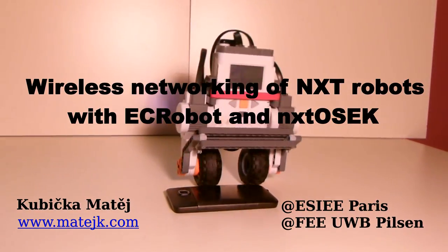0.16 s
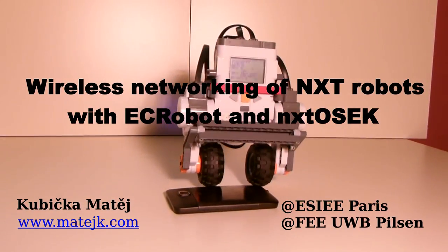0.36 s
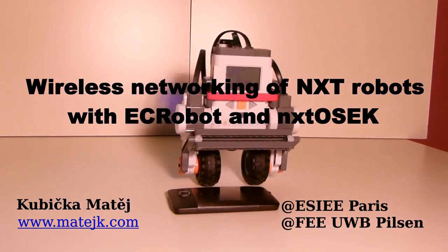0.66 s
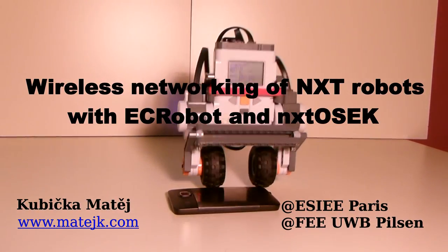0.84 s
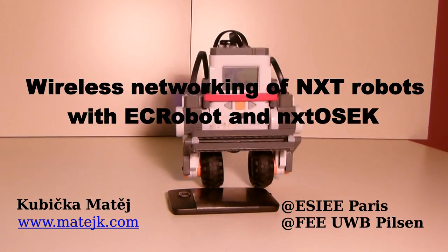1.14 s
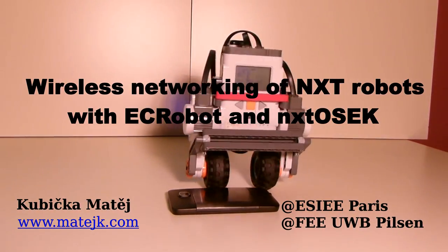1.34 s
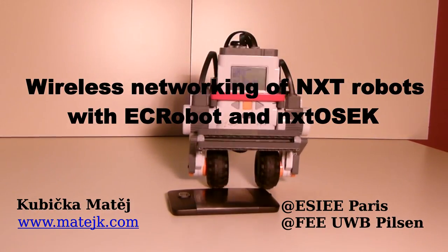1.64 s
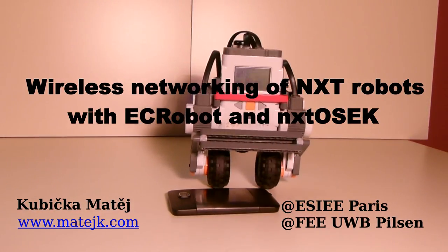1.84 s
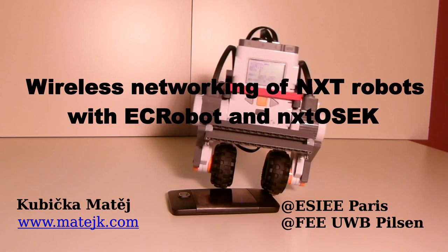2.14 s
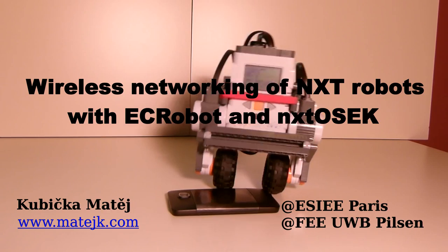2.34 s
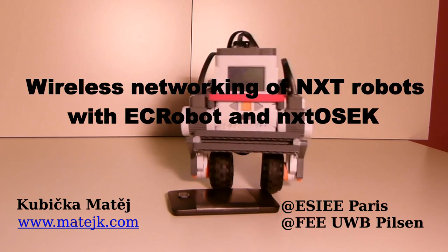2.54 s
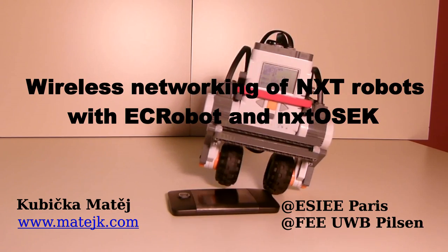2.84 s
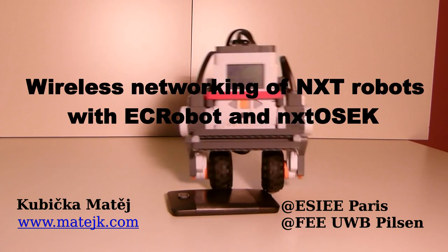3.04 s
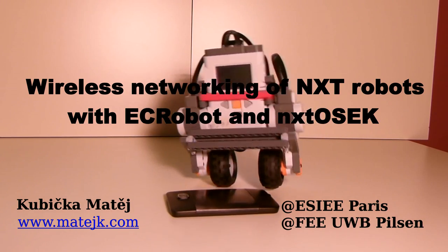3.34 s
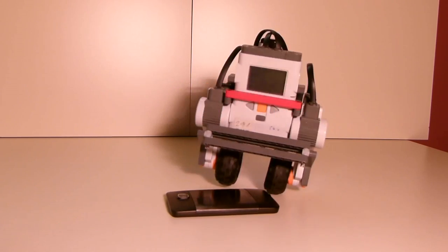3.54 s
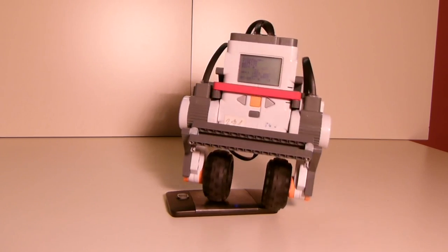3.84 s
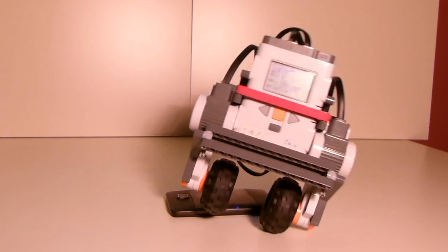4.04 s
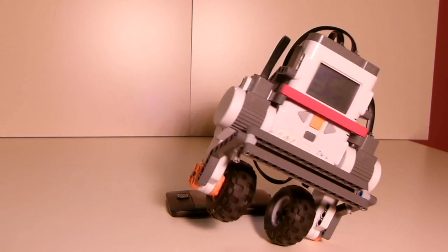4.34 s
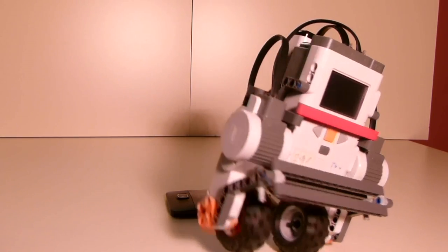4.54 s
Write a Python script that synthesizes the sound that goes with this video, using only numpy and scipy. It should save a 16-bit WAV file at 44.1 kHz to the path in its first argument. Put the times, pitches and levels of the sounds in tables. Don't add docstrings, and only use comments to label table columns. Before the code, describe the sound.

Gritty little servo whirs come and go two to four times a second, some with a brief nasal whine, as a toy robot rocks on its wheels. Tiny slack-gear snaps and dull table bumps fill the gaps over faint hiss and short room echo. Then comes a sustained hard whir, a second shove, a fade and an abrupt final run-up, drifting slightly right.

```python
import sys
import numpy as np
from scipy import signal
from scipy.fft import rfft, irfft
from scipy.io import wavfile
from scipy.ndimage import uniform_filter1d

SR = 44100
rng = np.random.default_rng(int(sys.argv[2]) if len(sys.argv) > 2 else 0)


def persist_wave(psi):
    counts = np.round(np.clip(psi, -1, 1) * 32767).astype(np.int16)
    wavfile.write(sys.argv[1], SR, np.atleast_2d(counts).T)


def gain_from_db(level_db):
    decades = np.asarray(level_db, float) / 20
    return 10 ** decades


N = 207005

MESH_ORDERS = (2, 3, 4), (1, 2, 3)
# pitch_hz, level_db (per Hz)
HOUSING = [(88, -104), (150, -61), (332, -10.5), (396, -21), (436, -17.5), (929, -12.5), (1690, 1.5),
           (1830, 1), (3340, -5), (3980, -1), (4920, -3.5), (5750, -1), (7840, -7), (12500, 4),
           (15500, -7.5)]
# pitch_hz, width_hz, level_db
SHELL = [(670, 29, 5), (1278, 290, -7.5), (1560, 13, -45), (2110, 67, -16.5), (3087, 43, -1),
         (3860, 330, -13.5), (4123, 32, 1), (5725, 116, -4.5), (6360, 480, -8), (7190, 53, -7.5),
         (10040, 580, -6), (10930, 120, -2)]
# start_s, end_s, start_level_db, end_level_db, brightness_db
PUSHES = [(-0.03, 0.012, -28, -26.5, -11), (0.185, 0.209, -30.5, -33.5, -8.5),
          (0.234, 0.332, -26.5, -27, -8), (0.492, 0.536, -36.5, -32.5, -2),
          (0.586, 0.628, -27.5, -29.5, -4.5), (0.78, 0.92, -30, -24.5, -8.5),
          (1.095, 1.115, -33, -34.5, -1.5), (1.147, 1.189, -32.5, -30, -6.5),
          (1.336, 1.409, -36.5, -27.5, -7), (1.416, 1.486, -28, -29.5, -3.5),
          (1.648, 1.727, -30.5, -28, -5), (1.9, 1.91, -27.5, -29, -8), (1.925, 1.988, -29.5, -26.5, -4),
          (2, 2.08, -28, -25, -4), (2.275, 2.326, -37.5, -38, 0), (2.363, 2.42, -38, -37, -6),
          (2.558, 2.618, -39.5, -28.5, -9.5), (2.619, 2.688, -29, -32.5, -11),
          (2.855, 2.928, -33, -40.5, -7.5), (3.073, 3.174, -27.5, -34, -3.5),
          (3.291, 3.344, -32.5, -26, -8), (3.369, 3.444, -25.5, -31, -3.5)]
# time_s, level_db
LURCH = [
    (3.51, -41),
    (3.545, -28),
    (3.692, -21),
    (3.83, -23),
    (4.022, -28.5),
    (4.06, -24.5),
    (4.188, -29.5),
    (4.312, -38),
    (4.44, -40.5),
         (4.47, -48),
    (4.505, -39.5),
    (4.57, -31),
    (4.64, -25),
    (4.69, -23),
]
# time_s, left_minus_right_db
PLACE = [
    (0, -0.1),
    (2.6, -0.8),
    (3.2, -0.2),
    (4.1, -0.45),
    (4.69, -2.2),
]
# start_s, length_s, mesh_rate_hz, level_db, loudest_multiple
PULLS_LEFT = [(0, 0.041, 576, -34.5, 3.3), (0.248, .1, 572, -36, 3.4), (.77, .19, 405, -40, 4),
              (1.077, 0.037, 450.5, -38.5, 3), (1.138, 0.076, 467, -42.5, 3), (1.388, .12, 401, -41, 4),
              (1.979, 0.13, 526, -35, 3.8), (2.373, 0.0593, 528.3, -44.5, 3), (2.836, 0.031, 470.8, -37, 3),
              (2.899, 0.043, 482.8, -47, 3), (3.066, .05, 550.7, -35.5, 3)]
PULLS_RIGHT = [
    (0.488, 0.046, 670, -41.5, 2),
    (0.588, 0.036, 625, -38, 3),
    (0.861, 0.067, 685, -30, 3.77),
    (1.41, 0.048, 700, -34.5, 3),
    (1.665, 0.053, 606.6, -40, 1.95),
    (1.71, .035, 614, -55, 3),
    (2.68, .04, 640, -43, 3),
]
# time_s, mesh_rate_hz, level_db, loudest_multiple
SURGES_LEFT = [
    [(3.28, 480, -47, 3), (3.318, 611, -34, 3.4), (3.36, 674, -36.5, 2.6), (3.38, 734, -35.5, 2.5),
     (3.411, 593, -37.5, 3.5), (3.46, 471, -56, 3.5)],
    [(3.55, 520, -50, 3), (3.6, 630, -42, 2.5), (3.638, 741, -35, 2.4), (3.66, 750, -47, 2),
     (3.696, 738, -33, 2), (3.74, 732, -46, 2)],
    [(4.02, 586, -52, 3), (4.06, 680, -42, 2), (4.1, 591, -47, 3.5)],
    [(4.56, 490, -47, 3.5), (4.632, 671, -38, 2.3), (4.69, 756, -29, 2)],
]
SURGES_RIGHT = [
    [(1.88, 476, -41, 3.3), (1.93, 591.2, -42, 3.5), (1.955, 658, -47, 3)],
    [(2.61, 590.5, -41, 2.83), (2.64, 680.4, -39, 3.6), (2.665, 777, -42, 2.7)],
    [(3.66, 880, -42, 2.04), (3.7, 870, -35, 1.8), (3.725, 870, -42.5, 1.8), (3.755, 865, -34, 2),
     (3.785, 855, -36, 1.74), (3.826, 847, -30.5, 2.02), (3.886, 730.5, -39, 2), (3.908, 668, -35, 3.04),
     (3.96, 546, -56, 3.46)],
    [(4.1, 700, -49, 3.1), (4.125, 670, -41, 3.8), (4.15, 640, -44, 3.37), (4.185, 610, -43, 3.93),
     (4.21, 575, -45, 3.55)],
]
# pitch_hz, gain_db
SONG_GAIN = [(700, -13), (1000, -15.5), (1400, -0.5), (2150, -2), (2600, -0.5), (3200, -3)]
# time_s, peak_db
CLICKS = [
    (0.5705, -16.5),
    (0.718, -33),
    (0.7462, -25.5),
    (1.2763, -27),
    (1.6325, -19.5),
    (1.873, -28),
    (2.2694, -25),
    (2.4967, -39),
    (2.83, -28),
    (3.0093, -24),
]
# time_s, peak_db, pitch_hz, t60_s
KNOCKS = [(0.004, -31.5, 307, 0.023), (0.083, -44.5, 718, 0.11), (0.112, -39.5, 770, 0.11),
          (0.256, -43, 673, 0.074), (0.566, -30, 442, 0.064), (0.963, -46, 442, 0.13),
          (1.122, -39.5, 670, 0.1), (1.158, -29.5, 425, 0.052), (1.651, -38, 670, 0.083),
          (1.683, -35, 423.8, 0.1), (2.117, -47, 415.1, 0.072), (2.632, -45.5, 347.6, 0.11),
          (2.873, -43, 421.3, 0.063), (3.064, -37, 733, 0.053), (3.669, -32, 427.7, 0.058),
          (3.719, -41, 330.6, 0.068), (4.098, -56.5, 561.2, 0.078), (4.303, -42.5, 413, 0.044),
          (4.655, -34, 358.5, 0.063)]
# time_s, peak_db, pitch_hz
BOOMS = [
    (0.097, -50, 168),
    (0.579, -49, 149),
    (0.893, -61, 144.8),
    (1.17, -78, 197.6),
    (1.699, -70, 135),
    (2.614, -64, 148.7),
    (3.099, -61.5, 134),
    (3.68, -63, 123.4),
    (4.309, -56, 121.4),
    (4.659, -53.5, 151.8),
]
# start_s, end_s, level_db
CHOPPER = [
    (.1, .25, -40.5),
    (.42, 0.559, -45),
    (0.693, 0.782, -42),
    (.98, 1.146, -47),
    (1.27, 1.502, -52),
    (2.27, 2.7, -43),
    (2.99, 3.302, -43.5),
    (3.6, 4.1, -40),
    (4.221, 4.62, -47.5),
]
# pitch_hz, level_db (per Hz)
IDLE_HISS = [(12, -75), (20, -35), (183, -17), (656, -4), (818, -4.5), (994, -1), (1080, -21), (1390, -5.5),
             (3270, -2), (5690, -0.5), (12000, -13), (13800, -28), (15000, -53)]

SPIN_UP_DB_S, COAST_DB_S, REST_DB = 400, 225, -58
LURCH_BRIGHT_DB, BRIGHT_PER_DB = -6, 0.32
LURCH_LOAD_DB, LURCH_LOAD_SHARE = -23, 0.62
LOW_DB, LOW_PER_DB, LOW_WANDER_DB = -3.5, -0.4332, 1.5
LOW_RAMP = 0.1
PULL_FADE_DB = -13.5
NEIGHBOUR_DB = -7.5
CHOPPER_HZ, CHOPPER_IDLE_DB, CHOPPER_EDGE_S = 7913, -56, .03
TICK_HZ, TICK_DB = 999, -61.5
IDLE_HISS_DB = -44
HEADROOM = .55


def gears(grip=.55):
    db, top_db, low_db = effort()
    pan_db, = columns([PLACE])
    mesh_hz = 520 * gain_from_db(.4 * (db + 30))
    motors = [(1.04, song(PULLS_LEFT, SURGES_LEFT), MESH_ORDERS[0]),
              (.95, song(PULLS_RIGHT, SURGES_RIGHT), MESH_ORDERS[1])]
    pair = []
    for slip, spans, orders in motors:
        body = shells(chatter(mesh_hz * slip))
        growl = level(colour(body, [(950, -0.5), (1200, 4), (2900, 2.0), (3500, -34.5)]), -5.0)
        hiss = level(colour(body, [(7600, -26.5), (8400, 2.0)]), -6.5)
        mid = gain_from_db(db) * level(band(body, 3160, 8080), -2.32)
        growl = gain_from_db(db + low_db) * growl
        hiss = gain_from_db(db + top_db + 2.3 * walk(16)) * hiss
        pair.append((mid, growl, hiss, *whine(spans, orders)))
    held = pair[0][-1] + pair[1][-1]
    loose = 1 / (1 + grip * held / gain_from_db(db + low_db))
    left, right = (mid + loose * growl + hiss + tone for mid, growl, hiss, tone, _ in pair)
    side = colour(left - right, [(300, -48), (1000, -12.5), (3000, -6.0), (10000, -3.5)])
    pan = gain_from_db(np.array([pan_db, -pan_db]) / 2)
    return pan * (left + right + np.array([side, -side]))


def effort():
    t = np.arange(N) / SR
    dbs, held = [], []
    for on, off, a, b, _ in PUSHES:
        edges_db = [a - SPIN_UP_DB_S, a, b, b - COAST_DB_S]
        dbs.append(np.interp(t, [on - 1, on, off, off + 1], edges_db))
        held.append(np.interp(t, [on, off], [a, b]))
    s, lurch_db = np.array(LURCH).T
    lurch_db = np.interp(t, s, lurch_db, left=REST_DB)
    dbs = np.array(dbs + [lurch_db])
    held = np.array(held + [LURCH_LOAD_DB + LURCH_LOAD_SHARE * (lurch_db - LURCH_LOAD_DB)])
    db, row = dbs.max(axis=0), dbs.argmax(axis=0)
    held = uniform_filter1d(held[row, np.arange(N)], size=400)
    bright = np.r_[np.array(PUSHES)[:, -1], LURCH_BRIGHT_DB][row]
    top_db = uniform_filter1d(bright, size=900) + BRIGHT_PER_DB * (db + 24)
    low_db = LOW_DB + LOW_PER_DB * (held + 30) + LOW_RAMP * (db - held) + LOW_WANDER_DB * walk(20)
    return db, top_db, low_db


def chatter(mesh_hz, hiss_db=3, slide=1.0, wobble_db=1.0):
    phase = np.cumsum(mesh_hz * (1 + .1 * walk(120))) / SR
    taps = np.diff(np.floor(phase), prepend=0) * rng.uniform(.3, 1, N)
    scrape = np.exp(-(phase % 1) / slide) * rng.standard_normal(N)
    wobble = gain_from_db(wobble_db * (walk(14) + walk(60)))
    return wobble * (level(taps, 0) + level(scrape, hiss_db))


def shells(x, patchy_db=3.0):
    body = colour(x, HOUSING)
    for hz, width, db in SHELL:
        ring = signal.lfilter(*signal.iirpeak(hz, hz / width, SR), body)
        body = body + gain_from_db(db + 2.5 + patchy_db * walk(24.92)) * ring
    return body


def song(pulls, surges):
    swell = (0, PULL_FADE_DB), (.25, -2.6), (.75, -2.3), (1, PULL_FADE_DB)
    spans = [[(s + d * share, hz, db + fade, k) for share, fade in swell] for s, d, hz, db, k in pulls]
    return sorted(spans + [list(map(tuple, s)) for s in surges])


def whine(spans, orders):
    hz, pull_db, loudest = columns(spans)
    gain_hz, gain_db = np.array(SONG_GAIN).T
    dbs = []
    for k in orders:
        housing_db = np.interp(np.log(k * hz), np.log(gain_hz), gain_db)
        dbs.append(pull_db + housing_db + NEIGHBOUR_DB * abs(k - loudest) + 2.2 * walk(55))
    t = np.arange(N) / SR
    on = 0
    for span in spans:
        inside_s = np.minimum(t - span[0][0] + .005, span[-1][0] - t + .005)
        on = on + np.clip(inside_s / .01, 0, 1)
    phase = 2 * np.pi * np.cumsum(hz * (1 + .008 * walk(140))) / SR
    stack = sum(gain_from_db(db + 2.4 * walk(75)) * np.sin(k * phase) for k, db in zip(orders, dbs))
    stack += gain_from_db(dbs[-1] - 9 + 3.0 * walk(30)) * np.sin((orders[-1] + 1) * phase)
    strength = gain_from_db(np.array(dbs)).sum(axis=0) * on
    return np.sqrt(2) * gain_from_db(4.5) * on * stack, strength


def clicks(t60=.014):
    t = np.arange(1000) / SR
    slaps = rng.standard_normal((len(CLICKS), len(t))) * np.exp(-np.log(1000) * t / t60)
    out = np.zeros(N)
    for (s, db), slap in zip(CLICKS, slaps):
        out[int(s * SR):][:len(t)] += gain_from_db(db - 8.5) * slap
    return colour(out, [(300, -44), (1500, 15), (4000, -46), (6000, 14.5), (15000, -4)])


def knocks(rise_s=0.0027, rattle_db=-6, lead_s=0.00392):
    out, t = np.zeros(N + SR), np.arange(SR // 4) / SR
    rattles = rng.standard_normal((len(KNOCKS), len(t)))
    for (s, db, hz, t60), rattle in zip(KNOCKS, rattles):
        ring = thump(t, hz, t60, rise_s) + gain_from_db(-16.0) * thump(t, 0.67 * hz, 2.0 * t60, rise_s)
        ring += gain_from_db(rattle_db + 8.0) * band(rattle * np.exp(-np.log(1000) * t / 0.35), 297, 904)
        ring += gain_from_db(-5) * (thump(t, 1394, 0.043, rise_s) + thump(t, 2350, 0.069, rise_s))
        out[int(max(s - lead_s, 0) * SR):][:len(t)] += gain_from_db(db + 3.0) * ring
    for s, db, hz in BOOMS:
        out[int(s * SR):][:len(t)] += gain_from_db(db - 0.5) * thump(t, hz, 0.24, 0.0135)
    return out[:N]


def thump(t, hz, t60, rise_s):
    push = 1 - np.exp(-(t / rise_s) ** 2)
    return push * np.exp(-np.log(1000) * t / t60) * np.sin(2 * np.pi * hz * t)


def electronics():
    t = np.arange(N) / SR
    spells = []
    for on, off, db in CHOPPER:
        corners_s = [on - CHOPPER_EDGE_S, on, off, off + CHOPPER_EDGE_S]
        spells.append(np.interp(t, corners_s, [CHOPPER_IDLE_DB, db, db, CHOPPER_IDLE_DB]))
    chopper_db = np.max(spells, axis=0) - 8 + 2 * walk(30)
    chopper = gain_from_db(chopper_db) * np.sin(2 * np.pi * CHOPPER_HZ * t + 1.1 * walk(40))
    tick = gain_from_db(TICK_DB + 1.5 * walk(25)) * np.sin(2 * np.pi * TICK_HZ * t + .4 * walk(12))
    return np.sqrt(2) * (chopper + tick)


def walls(x, t60=.35, wet_db=-13):
    t = np.arange(SR // 2) / SR
    tails = rng.standard_normal((2, len(t))) * np.exp(-np.log(1000) * t / t60) * (t > .003)
    tails *= gain_from_db(wet_db) / np.sqrt(np.sum(tails ** 2, axis=1, keepdims=True))
    x = colour(x, [(200, -14), (1200, 0)])
    return signal.fftconvolve(x[None], tails, axes=1)[:, :N]


def idle_hiss():
    mid = colour(rng.standard_normal(N), IDLE_HISS) * gain_from_db(2.7 * walk(4.95))
    side = colour(colour(rng.standard_normal(N), IDLE_HISS), [(200, -16), (1000, -3.5), (8000, -0.5)])
    return gain_from_db(IDLE_HISS_DB) * np.array([mid + side, mid - side]) / np.std(mid)


def colour(x, points):
    hz = np.maximum(np.fft.rfftfreq(2 ** 11, 1 / SR), 1)
    table = np.array(points)
    db = np.interp(np.log(hz), np.log(table[:, 0]), table[:, 1])
    cep = irfft(np.log(gain_from_db(db)))
    cep[1:2 ** 10] *= 2
    cep[2 ** 10 + 1:] = 0
    return signal.fftconvolve(x, irfft(np.exp(rfft(cep))))[:N]


def band(x, lo_hz, hi_hz):
    sos = signal.butter(3, [lo_hz, min(hi_hz, .45 * SR)], "band", fs=SR, output="sos")
    return signal.sosfilt(sos, x)


def level(x, db):
    return x * gain_from_db(db) / np.sqrt(np.mean(x ** 2))


def walk(rate):
    k = int(SR / rate)
    held = np.repeat(rng.standard_normal(N // 100)[:N // k + 1], k)
    return 1.3 * uniform_filter1d(uniform_filter1d(held, k), k)[:N]


def columns(spans):
    s, *rest = np.vstack(spans).T
    return [np.interp(np.arange(N) / SR, s, c) for c in rest]


def scene():
    robot = gears() + knocks() + clicks() + electronics()
    return robot + walls(robot.mean(axis=0)) + idle_hiss()


def low_pass(x):
    return signal.sosfilt(signal.butter(12, 15610, fs=SR, output="sos"), x)


def record(dry):
    rounding = HEADROOM * np.tanh(dry / HEADROOM) - dry
    ports = gain_from_db(np.array([[-.4], [.4]]))
    mix = (dry + band(rounding, 470, 14000)) * ports
    return low_pass(mix)


dry = scene()
out = record(dry)
persist_wave(out)
```